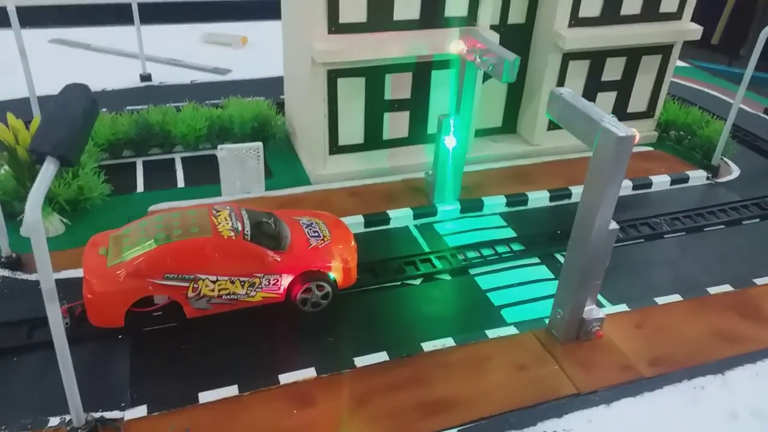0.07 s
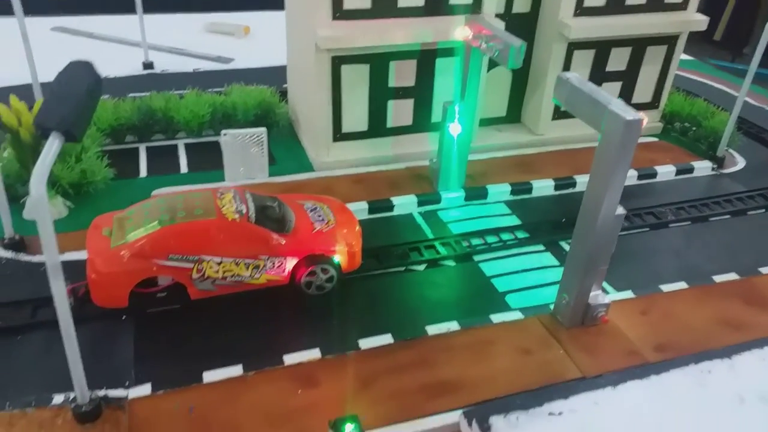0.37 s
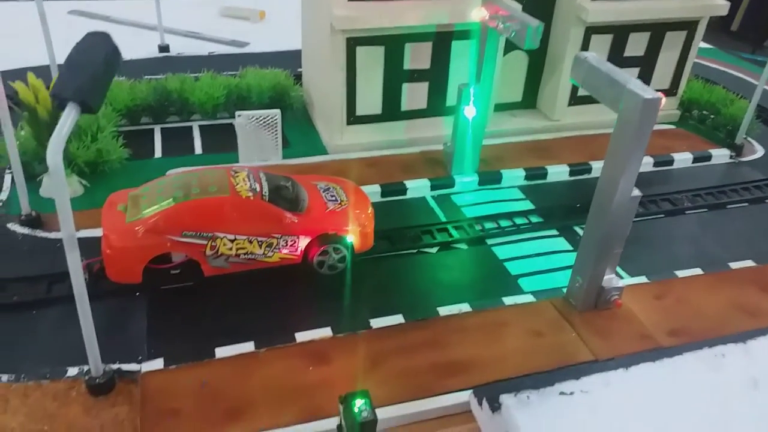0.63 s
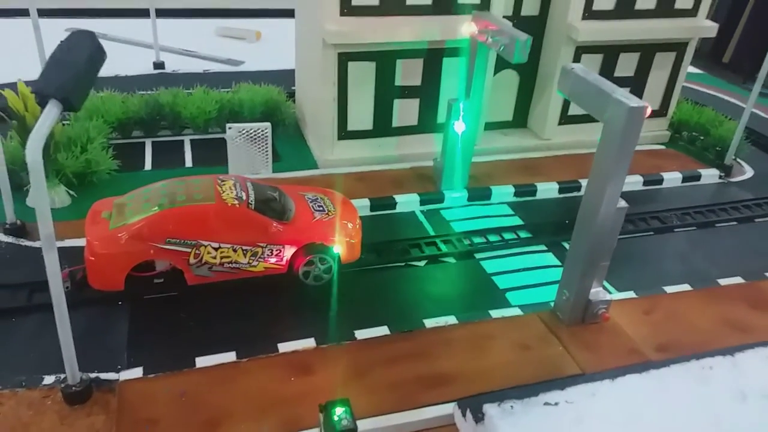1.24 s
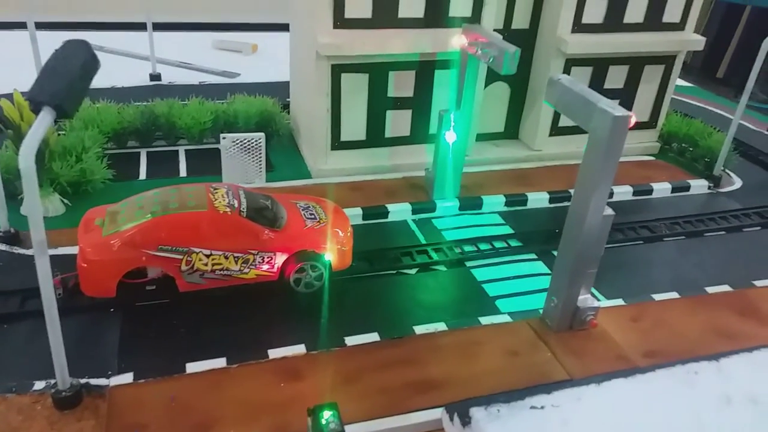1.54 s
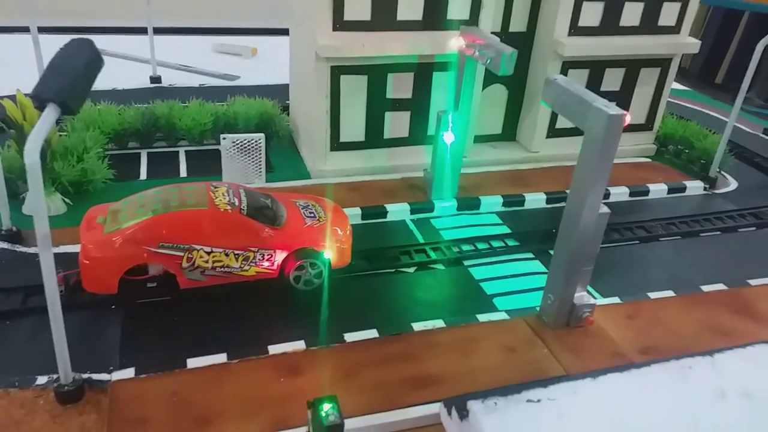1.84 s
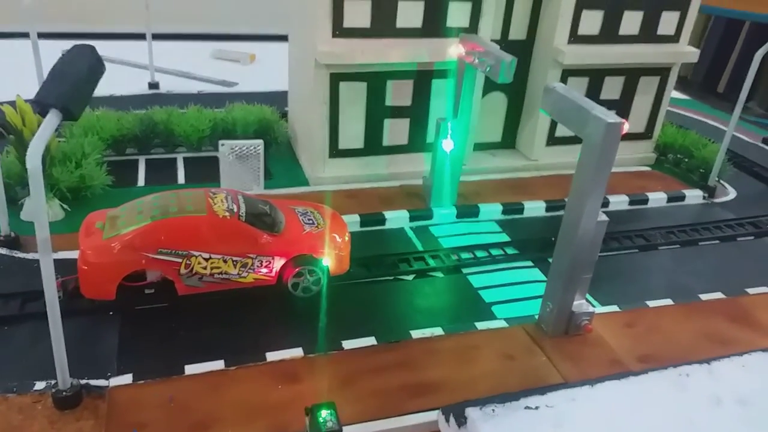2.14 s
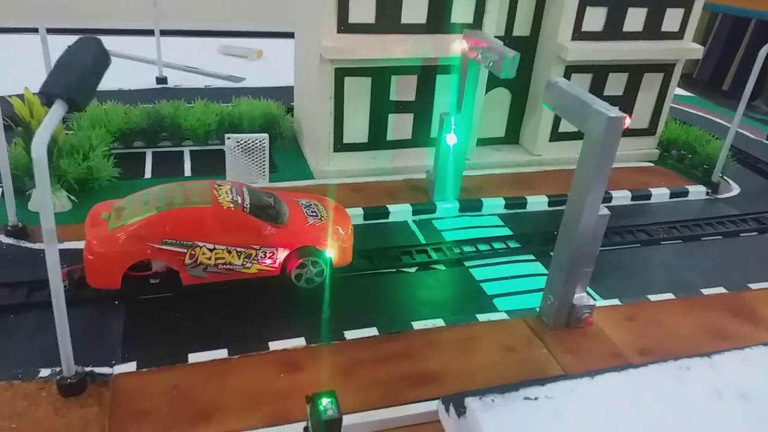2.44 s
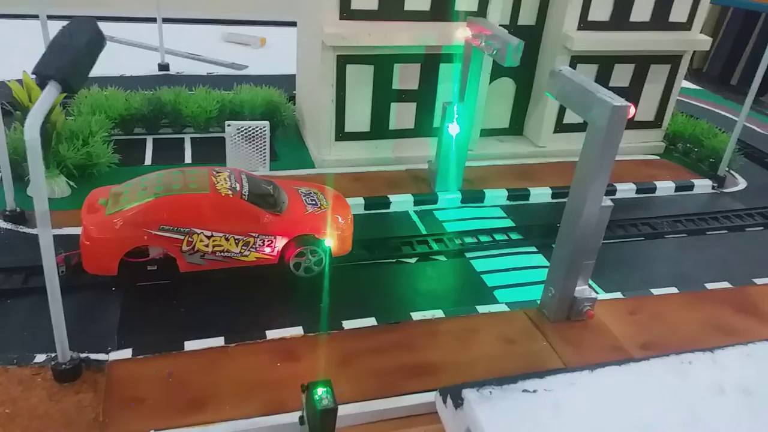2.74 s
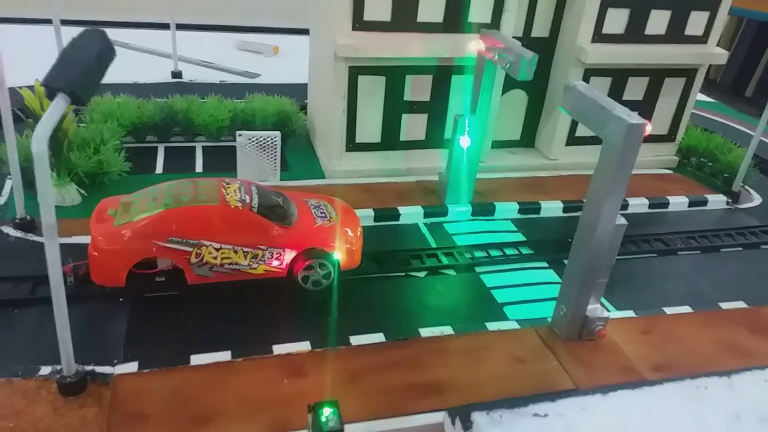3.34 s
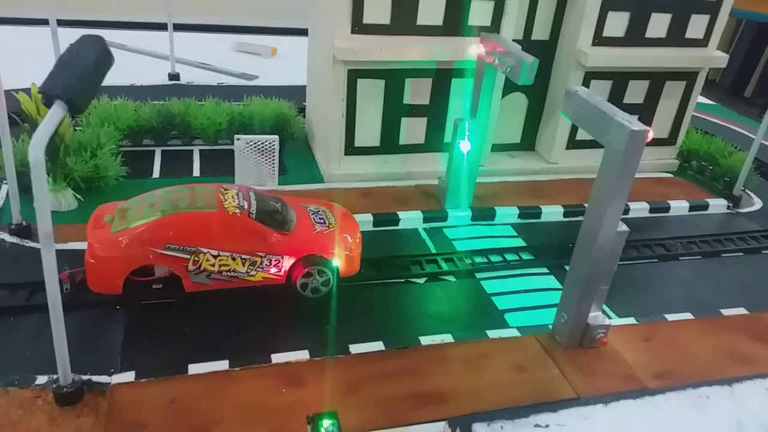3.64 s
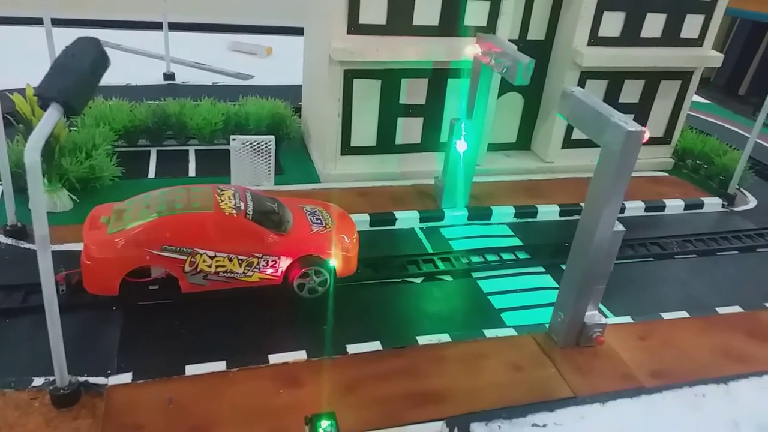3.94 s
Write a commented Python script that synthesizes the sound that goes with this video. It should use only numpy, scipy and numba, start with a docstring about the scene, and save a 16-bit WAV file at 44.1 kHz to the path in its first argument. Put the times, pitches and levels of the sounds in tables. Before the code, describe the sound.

Air spits and hisses briefly, then dies away, leaving faint hum and room noise.

```python
"""A short spit as air or gas breaks from an outlet in a reverberant room, then a bright jet and a lower,
louder rush that swells and shuts. The hiss dies away over a fading, ringing wash, leaving wavering
electrical hum and room noise, with a thin whine late on. Two faint swishes come from a distance.
One microphone in the room, the same in both ears."""
import sys
import numpy as np
from scipy import signal
from scipy.fft import rfft, irfft
from scipy.io import wavfile
from numba import njit

SR = 44100
rng = np.random.default_rng(int(sys.argv[2]) if len(sys.argv) > 2 else 0)


def dump(signal):
    """Clip the signal to [-1, 1] and save it as 16-bit WAV at the path in sys.argv[1]."""
    limited = np.clip(np.atleast_2d(signal).T, -1, 1)
    pcm = np.round(limited * 32767).astype(np.int16)
    wavfile.write(sys.argv[1], SR, pcm)


N = 176400

# Noise spectra, shape only: f/Hz, level/dB per Hz
JET_SPECTRUM = [(760, -42), (1300, -12.5), (1380, -13), (1490, -6.5), (1810, -15.5), (1990, -6.5),
                (2430, -10.5), (3800, -3), (5040, -6), (6750, -1.5), (8850, -14), (12400, -2.5),
                (15700, -1.5)]  # bright hiss at the outlet
THRUST_SPECTRUM = [(50, -28), (100, 2), (250, -3), (500, 2), (900, -1), (1500, -11.5), (3000, -30)]  # low push under the jet
RUSH_SPECTRUM = [(290, -61), (500, -19), (569, -42), (687, -20), (1220, -15.5), (1390, -12), (1520, -10),
                 (2110, -4.5), (2950, -5.5), (3550, -3.5), (7000, -7.5), (8820, -29), (15700, -35)]  # the lower rush
SWISH_SPECTRUM = [(290, -37), (500, -3), (727, -3), (1110, -13), (1410, -7.5), (2000, -6.5), (3210, -6.5),
                  (6240, -10.5), (9210, -28), (15700, -27)]  # body of a distant swish
WASH_SPECTRUM = [(120, -33), (200, -1), (359, -8), (655, -5), (731, -19), (894, -4), (1050, -0.5),
                 (1260, -6.5), (1690, 0.5), (2390, -12), (4220, -4), (6900, -17), (8920, -23), (14600, -21),
                 (15700, -22)]  # noise in the ringing wash
ROOM_SPECTRUM = [(28, -52), (40, -30), (50, -21), (80, -13), (105, -9), (135, -7.5), (220, -3.5), (340, -6),
                 (600, -12.5), (950, -14), (1700, -19), (2500, -21), (3300, -21), (4800, -25.5),
                 (7000, -26.5), (9100, -41), (11500, -32), (15700, -29.5)]  # the room's own noise
# Level curves: t/s, level/dB
RUSH_ENVELOPE = [(.22, -38), (.31, -24.5), (.43, -21), (.47, -19), (.53, -16), (.575, -19.5), (.625, -19.5),
                 (.67, -28), (.76, -40), (.9, -86)]  # the rush swelling and shutting
WHINE_ENVELOPE = [(1.8, -72), (2.7, -56.5), (3.6, -51.5), (4, -62)]  # the late whine
ROOM_TOP_ENVELOPE = [(0, -1), (.8, -1.5), (1.4, -3.5), (1.8, 0), (3, -0.5), (4, 1)]  # gain on the room noise above the bass
# Leak that outlasts the jet: f/Hz, width/Hz, level/dB, hold/s, fall/(dB/s)
LEAK_BANDS = [(6180, 2400, -33.5, .52, 73), (15200, 2200, -45, .68, 55)]
# Resonance moving through the rush: t/s, f/Hz, level/dB
RUSH_RESONANCE = [(.26, 2220, -46), (.31, 2430, -23.5), (.42, 2800, -27), (.47, 3360, -20),
                  (.53, 3510, -17), (.6, 3450, -22), (.7, 3500, -56), (.9, 3500, -90)]
# Resonances of the spit: f/Hz, width/Hz, relative level/dB
SPIT_RESONANCES = [(2800, 440, -0.5), (3840, 1200, 1), (6140, 170, -9), (7050, 230, -6.5), (11800, 400, -5),
                   (15200, 600, -13)]
# Distant swishes: t/s, level/dB, relative level of the bright edge/dB, attack/s, fall/(dB/s)
DISTANT_SWISHES = [(1.583, -36.5, -15, 0.031, 66), (3.595, -39.5, -6.5, .02, 160.5)]
# Tones ringing in the wash: f/Hz, starting level/dB
WASH_PARTIALS = [(94, -42.5), (151, -43.5), (910, -42.5), (1071, -46), (1744, -55.5), (1890, -50),
                 (3644, -50)]
# Tones of the electrical hum: f/Hz, level/dB
HUM_PARTIALS = [(64, -65), (100, -60), (111, -56), (160, -49.5), (200, -50), (222, -58)]
# Reverberation of the room: f/Hz, time to fall 60 dB/s
ROOM_DECAY = [(200, 0.69), (1500, 1.28), (4000, 1.2), (9000, 1.58), (15000, 1.48)]


def jet():
    """The jet opens fully over a low thrust, sags as the pressure drops and leaves a thin, sizzling leak."""
    start, attack, opening_s, shut_s, swell_db = 0.1227, .003, 0.092, 0.65, 2
    opening = undb(-swell_db * np.clip(1 - (clock() - start) / opening_s, 0, 1))
    hiss = undb(-14.5) * noise(JET_SPECTRUM) * opening * burst(start, attack, opening_s, fall=41.5)
    thrust = undb(-30.5) * noise(THRUST_SPECTRUM) * burst(start, attack, hold=0.017, fall=55)
    leak = sum(undb(db) * band(hz, width) * burst(start, attack, hold, fall)
               for hz, width, db, hold, fall in LEAK_BANDS)
    shutting = undb(-115 * np.maximum(clock() - shut_s, 0))
    return (hiss + thrust) * shutting + leak


def rush():
    """The lower rush, loudest at the microphone, swells and shuts; a resonance climbs through it."""
    peak_db = curve([(t, db) for t, hz, db in RUSH_RESONANCE])
    peak_hz = curve([(t, hz) for t, hz, db in RUSH_RESONANCE])
    resonance = undb(peak_db) * band(peak_hz, width=1400)
    return noise(RUSH_SPECTRUM) * undb(curve(RUSH_ENVELOPE)) + resonance


def spit():
    """The outlet cracks open and rings briefly, just ahead of the jet."""
    start = .0872
    rings = unit(sum(undb(db) * band(hz, width) for hz, width, db in SPIT_RESONANCES))
    crack = undb(-17.5) * noise(JET_SPECTRUM) * burst(start, attack=0.0011, hold=0.0039, fall=750)
    return crack + undb(-21) * rings * burst(start, attack=0.0025, hold=0.012, fall=330)


def swishes():
    """Two swishes far from the microphone, each led in by a duller scuff; a tiny wisp of hiss between."""
    out = undb(-55) * noise(JET_SPECTRUM) * burst(1.945, attack=0.018, hold=.01, fall=150)  # the wisp
    for start, db, edge_db, attack, fall in DISTANT_SWISHES:
        scuff = undb(-11.5) * band(1770, width=810) * burst(start - 0.08, attack=.06, hold=0.044, fall=40)
        hiss = noise(SWISH_SPECTRUM) + undb(edge_db) * noise(JET_SPECTRUM)
        out += undb(db) * (scuff + hiss * burst(start, attack, hold=0.015, fall=fall))
    return out


def wash():
    """A diffuse ringing, there from the start, that fades under the hiss."""
    tones = sum(undb(db) * tone(hz, drift_hz=6.8, rate=25) for hz, db in WASH_PARTIALS)
    return (tones + undb(-34) * noise(WASH_SPECTRUM)) * burst(0, attack=.01, hold=0.1, fall=64)


def hum():
    """Low electrical hum that wavers and grows slowly, with a thin whine late on."""
    waver_db, waver_hz, rise_db_s = 2.2, 8.2, 1.1
    low = sum(undb(db + waver_db * walk(waver_hz)) * tone(hz, drift_hz=1.54, rate=waver_hz)
              for hz, db in HUM_PARTIALS)
    whine = tone(893, drift_hz=1.9, rate=10) * undb(curve(WHINE_ENVELOPE) + walk(9.3))
    return low * undb(rise_db_s * (clock() - 3.5)) + whine


def room_tone():
    """Background noise: steady bass, a top whose level dips after the hiss and recovers, a middle that swells
    late."""
    bass_edge_hz, middle_full_s, middle_rise_db_s = 93, 3.73, 18.5
    air = noise(ROOM_SPECTRUM) + undb(-18) * band(3230, width=1300)
    bass = signal.sosfiltfilt(signal.butter(2, bass_edge_hz, fs=SR, output="sos"), air)
    top = (air - bass) * undb(curve(ROOM_TOP_ENVELOPE))
    middle_db = -47 - middle_rise_db_s * np.maximum(middle_full_s - clock(), 0)
    return undb(-40.5) * (bass + top) + undb(middle_db) * band(530, width=520)


def room(x):
    """Sound reaches the microphone directly, then as dense early reflections and a long diffuse tail."""
    early_t60_s = 0.39
    grain, tail = rfft(rng.standard_normal(N)), 0
    for centre, t60 in ROOM_DECAY:
        share = on_log_axis([(hz, hz == centre) for hz, _ in ROOM_DECAY], bins())  # crossfaded bands
        tail += irfft(grain * share, N) * undb(-60 * clock() / t60)
    early = rng.standard_normal(N) * undb(-60 * clock() / early_t60_s)
    response = (undb(-7) * unit(tail) + undb(-8) * unit(early)) / np.sqrt(N)
    response[0] = 1  # the direct path
    return signal.fftconvolve(x, response / np.linalg.norm(response))[:N]


def undb(db):
    """Decibels to gain."""
    return 10 ** (np.asarray(db) / 20)


def unit(x):
    """Scale to rms 1."""
    return x / np.sqrt(np.mean(x ** 2))


def clock():
    """Time of every sample, in s."""
    return np.arange(N) / SR


def bins():
    """Frequency of every spectrum bin, in Hz."""
    return np.arange(N // 2 + 1) * SR / N


def curve(rows):
    """Join (t/s, value) rows by straight lines."""
    return np.interp(clock(), *np.array(rows).T)


def on_log_axis(rows, hz):
    """Read (f/Hz, value) rows on a log-frequency axis."""
    freqs, values = np.array(rows).T
    return np.interp(np.log(hz + 1e-3), np.log(freqs), values)


def noise(spectrum):
    """Noise of rms 1 with a given spectrum, falling steeply below its first point."""
    hz = bins()
    gain = undb(on_log_axis(spectrum, hz)) * np.minimum(hz / spectrum[0][0], 1) ** 2
    return unit(irfft(rfft(rng.standard_normal(N)) * gain, N))


@njit
def bandpass(x, hz, width):
    """State-variable band-pass whose centre may move."""
    y, band_state, low_state = np.empty(len(x)), 0., 0.
    for i in range(len(x)):
        gain = np.tan(np.pi * hz[i] / SR)
        damping = np.pi * width / SR * (gain + 1 / gain)
        passed = (band_state + gain * (x[i] - low_state)) / (1 + gain * (gain + damping))
        band_state = 2 * passed - band_state
        low_state += 2 * gain * passed
        y[i] = damping * passed
    return y


def band(hz, width):
    """Noise of rms 1 in one steep-sided resonance, still or moving; width in Hz."""
    centre = hz * np.ones(N)
    once = bandpass(rng.standard_normal(N), centre, float(width))
    return unit(bandpass(once, centre, float(width)))


def walk(rate):
    """Smooth random wander of rms 1, up to about rate Hz."""
    return unit(irfft(rfft(rng.standard_normal(N)) * np.exp(-(bins() / rate) ** 2), N))


def burst(start, attack, hold, fall):
    """Rise up to the start time, hold, then fall; times in s, fall in dB/s."""
    age = clock() - start
    return np.clip(1 + age / attack, 0, 1) * undb(-fall * np.maximum(age - hold, 0))


def tone(hz, drift_hz, rate):
    """A sine of rms 1 whose pitch wanders."""
    cycles = np.cumsum(hz + drift_hz * walk(rate)) / SR
    return np.sqrt(2) * np.sin(2 * np.pi * (cycles + rng.random()))


def scene():
    """At the microphone: sputtering hiss and distant swishes through the room, over wash, noise and hum."""
    sputter_db = 0.8
    escape = (spit() + jet() + rush()) * undb(sputter_db * walk(rate=270))
    mono = room(escape + swishes()) + wash() + room_tone() + hum()
    return np.array([mono, mono])


def record(dry):
    """The recorder cuts the top steeply."""
    top_hz = 15700
    return signal.sosfilt(signal.ellip(12, .1, 80, top_hz, fs=SR, output="sos"), dry)


dry = scene()
out = record(dry)
dump(out)
```